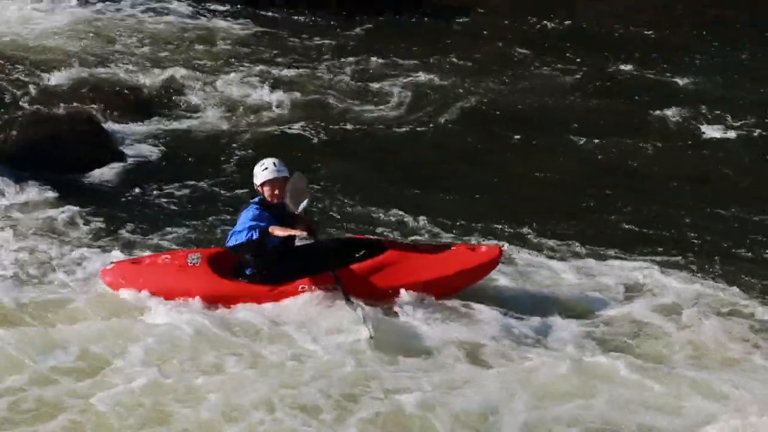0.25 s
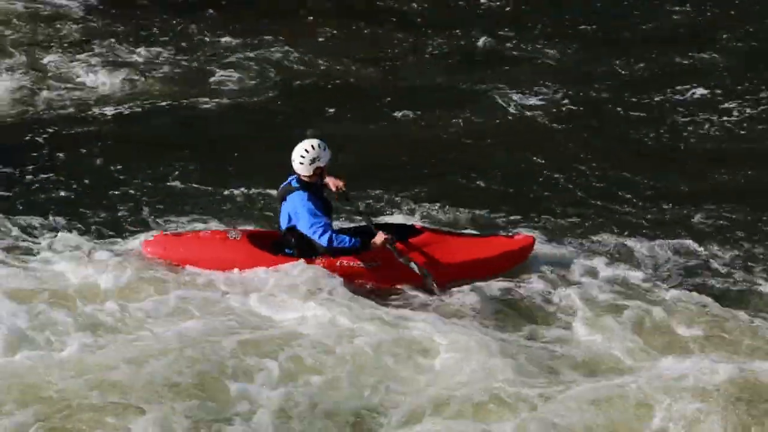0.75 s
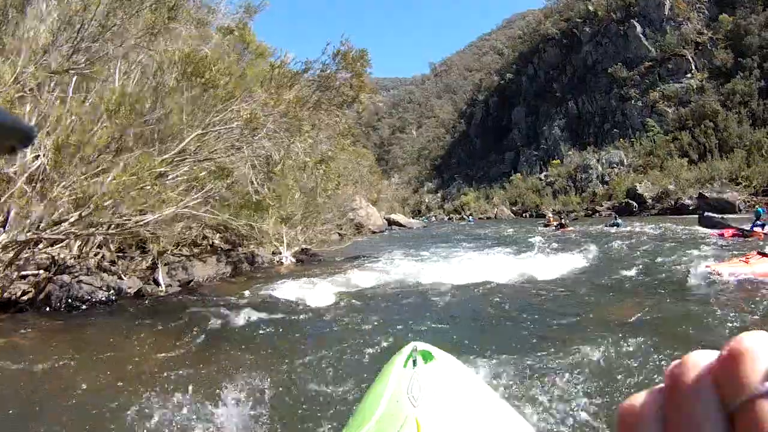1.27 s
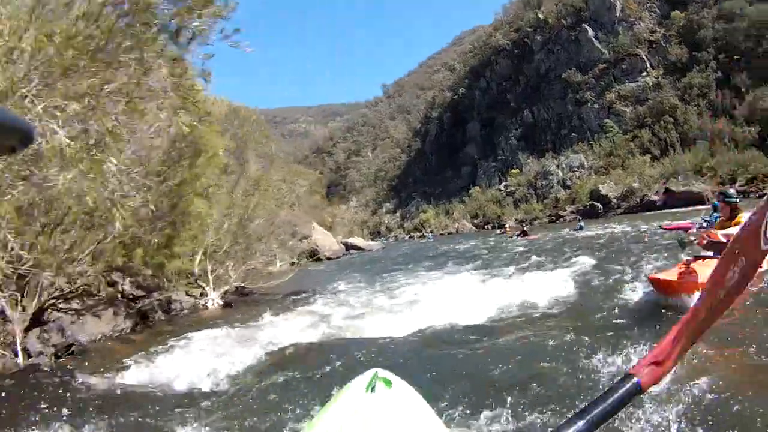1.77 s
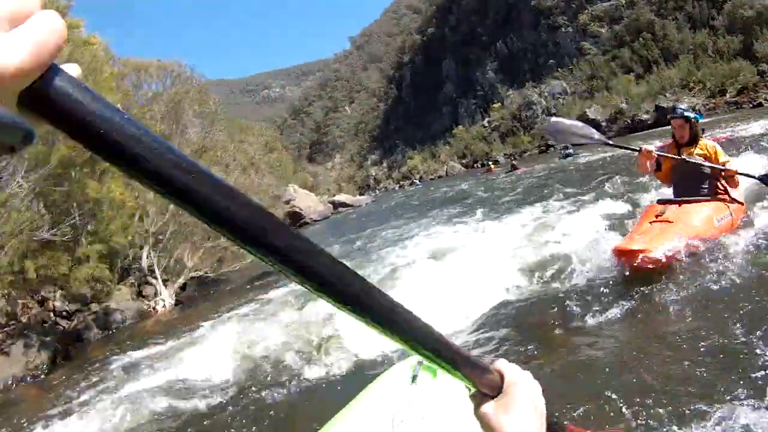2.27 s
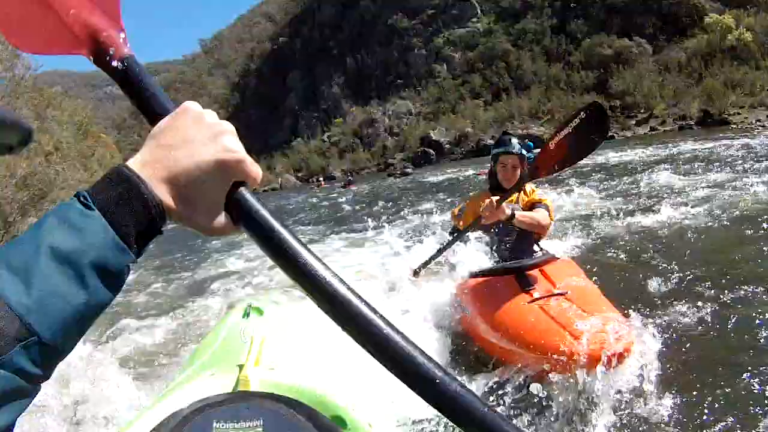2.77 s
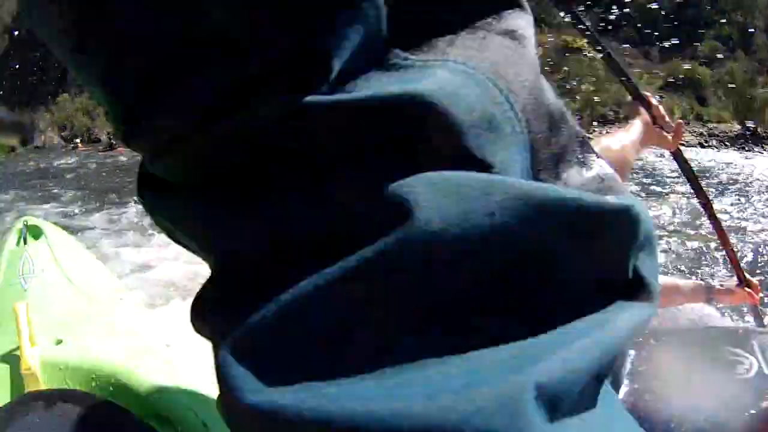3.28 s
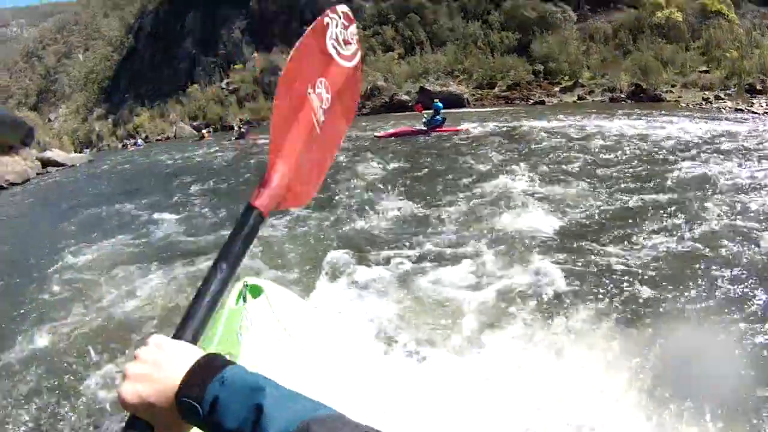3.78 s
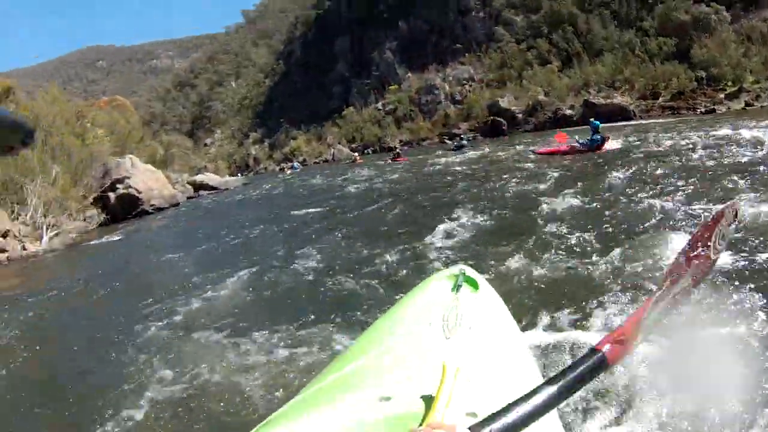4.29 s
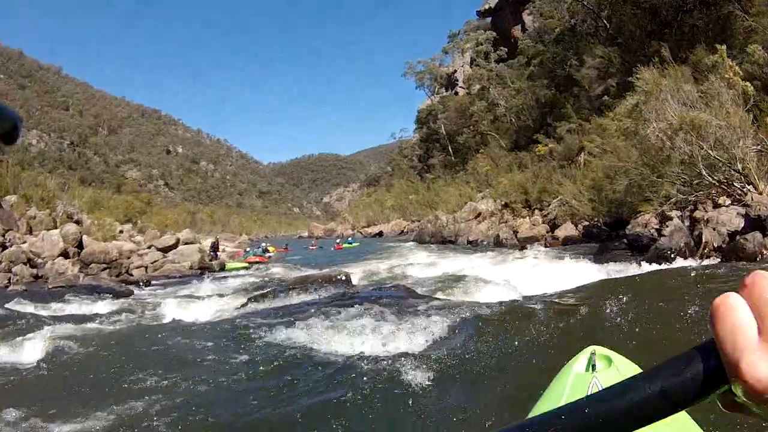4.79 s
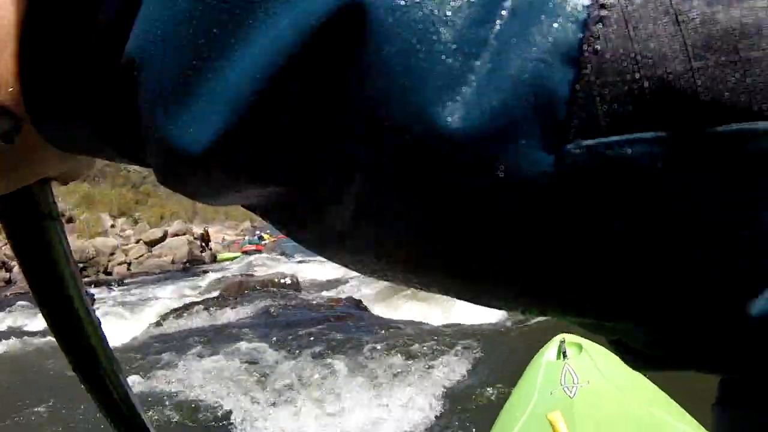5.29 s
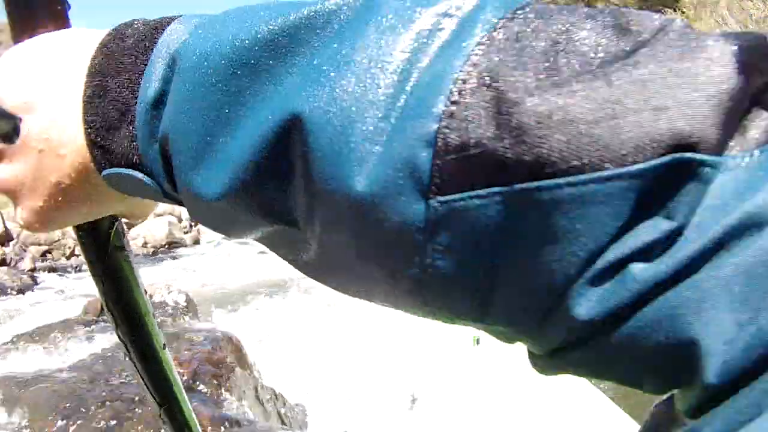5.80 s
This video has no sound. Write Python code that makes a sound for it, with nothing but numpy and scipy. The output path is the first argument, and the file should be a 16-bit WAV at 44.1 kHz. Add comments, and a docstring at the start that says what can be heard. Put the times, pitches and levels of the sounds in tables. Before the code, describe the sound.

Loud whitewater roars with wind buffeting the microphone, then cuts abruptly to faint water rushing and fizzing around a paddled kayak.

```python
"""Whitewater roars as countless bubbles ring in river rapids, heard from the bank while wind buffets
the two microphones. At 1.11 s the scene switches to a kayak, faint and in mono through a waterproof
camera case. Paddle strokes stir up foam and spray, water knocks on the hull, drops hit the case,
and the boat ploughs through a breaking wave that leaves fizzing froth.
At 4.48 s a calmer stretch begins, slowly growing louder as the next rapid draws near."""
import sys
import numpy as np
from scipy import signal
from scipy.fft import rfft, irfft
from scipy.io import wavfile
from scipy.ndimage import uniform_filter1d

SR = 44100
rng = np.random.default_rng(int(sys.argv[2]) if len(sys.argv) > 2 else 0)


def bounce(signal):
    """Save signal as a 16-bit WAV file at the path given by the first command-line argument."""
    frames = np.transpose(np.atleast_2d(signal))
    limited = np.clip(frames, -1, 1)
    pcm = np.round(limited * 32767).astype(np.int16)
    wavfile.write(sys.argv[1], SR, pcm)


N = 266805
TIME = np.arange(N) / SR
FREQS = np.maximum(np.arange(N // 2 + 1) * SR / N, 1)
ON_BOAT_S, CALMER_S = 1.1115, 4.483
CHURN_TOP_HZ, SPRAY_FROM_HZ, CUTOFF_HZ = 600, 4000, 14900


def from_db(db):
    """Turn decibels into a number to multiply by."""
    return 10 ** (np.asarray(db) / 20)


def rms_one(x):
    """Scale a signal so that its average strength (rms) is 1."""
    return x / np.sqrt(np.mean(x ** 2) + 1e-20)


def at_hz(points):
    """Join a table's points into a curve over all frequencies, spaced by octaves."""
    hz, value = np.transpose(points)
    return np.interp(np.log(FREQS), np.log(hz), value)


def below(hz, order=4):
    """A filter curve that keeps the lows; a higher order cuts more steeply."""
    return 1 / np.sqrt(1 + (FREQS / hz) ** (2 * order))


def above(hz, order=4):
    """A filter curve that keeps the highs."""
    return 1 / np.sqrt(1 + (hz / FREQS) ** (2 * order))


def colour(x, gain):
    """Turn each frequency of a sound up or down by a filter curve."""
    return irfft(rfft(x) * gain, N)


def around(s, reach_s):
    """The samples within reach of a moment."""
    return slice(max(int((s - reach_s) * SR), 0), int((s + reach_s) * SR))


def humps(rows):
    """Smooth bell-shaped rises and dips, in dB."""
    out = np.zeros(N)
    for s, db, half_s in rows:
        span = around(s, np.pi * half_s)
        out[span] += db * np.exp(-((TIME[span] - s) / half_s) ** 2)
    return out


def drift(rate_hz):
    """A smooth random wobble, typically about 1 in size."""
    step, warm_up = 40, 2000   # one random value every 40 samples
    decay = np.exp(-2 * np.pi * step * rate_hz / SR)
    noise = rng.standard_normal(N // step + warm_up + 2)
    slow = signal.lfilter([1], [1, -2 * decay, decay * decay], noise)[warm_up:]
    return np.interp(np.arange(N) / step, np.arange(len(slow)), rms_one(slow))


def bubbles(per_s, spread_db, cycles, low_hz, high_hz, pitches=20):
    """Bubbles of random size, each ringing for a few cycles at its own pitch."""
    starts = np.flatnonzero(rng.random(N) < per_s / SR)
    sizes = from_db(spread_db * np.minimum(rng.exponential(1, len(starts)), 4))
    sizes *= rng.choice([-1, 1], len(starts))
    pitch_of = rng.integers(0, pitches, len(starts))
    out = np.zeros(N)
    for k, hz in enumerate(np.geomspace(low_hz, min(high_hz, SR / 2.2), pitches)):
        clicks = np.full(N, 1e-18)
        clicks[starts[pitch_of == k]] = sizes[pitch_of == k]
        decay = np.exp(-np.log(1000) * hz / (cycles * SR))   # 60 dB down after that many cycles
        ringing = [1, -2 * decay * np.cos(2 * np.pi * hz / SR), decay * decay]
        out += signal.lfilter([1 - decay, 0, decay - 1], ringing, clicks)
    return rms_one(out)


def swell_ring(start, hz, swell_s):
    """A soft, wet hit: a tone swells briefly, then dies away."""
    out = np.zeros(N)
    span = slice(int(start * SR), int(start * SR) + SR // 2)
    age = np.maximum(TIME[span] - start, 0)
    out[span] = age / swell_s * np.exp(1 - age / swell_s) * np.sin(2 * np.pi * hz * age)
    return out


# The roar's tone, from low to high: f/Hz, level/dB
ROAR_TONE = [(40, -16), (100, -10.5), (220, -2.5), (340, -2.5), (550, -6.5), (850, -9.5), (1300, -12.5),
             (2300, -15), (4000, -20.5), (7000, -27), (10000, -32), (14500, -40)]
# Narrow bands that ring in the roar: f/Hz, width/Hz, boost/dB
ROAR_RINGS = [(755, 40, 0.5), (999, 66, 5.5)]
# Roughly how much louder the roar is on the left: f/Hz, left minus right/dB
ROAR_LEFT_LEAN = [(200, 1.6), (800, 2.3), (2000, 5.6), (5500, 6.7), (9000, 7.7), (15000, 11.3)]
# How alike the two sides sound: f/Hz, likeness (0 to 1)
SIDE_LIKENESS = [(200, 0.93), (850, 0.92), (1700, 0.83), (3400, 0.39), (6500, 0.45), (12000, .25)]
# Collapsing waves that make the roar swell: t/s, boost/dB, half length/s
COLLAPSING_WAVES = [(.33, 1.94, .13), (.83, 1.7, 0.15)]
def roar(level_db=-26.0, left_delay_s=0.00018, right_delay_s=0.000095):
    """Countless bubbles merge into a roar, louder on the left and a touch earlier on the right."""
    rings_db = sum(db / (1 + (2 * (FREQS - hz) / width) ** 2) for hz, width, db in ROAR_RINGS)
    tone = rms_one(from_db(at_hz(ROAR_TONE) + rings_db) * above(30))
    water = rfft(rms_one(rng.standard_normal(N) + 0.5 * bubbles(6000, 2.4, 12.0, 313, 11700)))
    alike, lean_db = np.clip(at_hz(SIDE_LIKENESS), 0, 1), at_hz(ROAR_LEFT_LEAN)
    mics = []
    for side, delay_s in ((0.98, left_delay_s), (-1.1, right_delay_s)):
        shared = np.sqrt(alike) * water * np.exp(-2j * np.pi * FREQS * delay_s)
        scattered = np.sqrt(1 - alike) * rfft(rng.standard_normal(N))
        mics.append(irfft((shared + scattered) * tone * from_db(side * lean_db / 2), N))
    return from_db(level_db + humps(COLLAPSING_WAVES)) * np.array(mics)


# The wind's tone at the left and the right microphone: f/Hz, level/dB
LEFT_WIND_TONE = [(15, -28), (40, -16), (80, -3.5), (140, -.5), (240, .5), (450, -8.5), (700, -17),
                  (1500, -35)]
RIGHT_WIND_TONE = [(15, -28), (40, -16), (80, 0.5), (125, -0.5), (200, -3), (350, -8), (800, -39)]
# Gusts and lulls on the left: t/s, level change/dB, half length/s
LEFT_GUSTS = [(.075, -6.5, 0.023), (.305, -3.5, 0.021), (.4, 0.5, .05), (.508, -9, 0.029), (.57, 4, 0.023),
              (.7, -2.5, 0.07), (.81, 2.5, 0.021), (.89, -11.5, .03), (1.04, -3.5, 0.044)]
# Single swirls of air that slap the left microphone: t/s, level/dB, f/Hz
AIR_SLAPS = [(.168, -8, 190), (.378, -5.5, 330), (.463, -7, 266), (.561, -13, 240), (.828, -6.5, 290),
             (.980, -6, 267), (1.058, -5, 260)]
def wind(left_db=-18.5, right_db=-27.5, flutter_db=1.98):
    """Swirling air rumbles at each microphone; the strongest swirls give one push and pull."""
    mics = []
    for gust_db, tone in ((left_db + humps(LEFT_GUSTS), LEFT_WIND_TONE), (right_db, RIGHT_WIND_TONE)):
        swirls = colour(rng.standard_normal(N), from_db(at_hz(tone)) * below(1500))
        swirls /= np.sqrt(uniform_filter1d(swirls ** 2, size=2600))   # even out the noise's own swells
        mics.append(swirls * from_db(gust_db + flutter_db * drift(43)))
    for s, db, hz in AIR_SLAPS:
        span = around(s, 1 / hz)
        phase = 2 * np.pi * hz * (TIME[span] - s)
        mics[0][span] -= from_db(db) * phase * np.exp((1 - phase ** 2) / 2)
    return np.array(mics)


# How lively the water is around the wave, given as its foam's loudness: t/s, level/dB
WAVE_LIVELINESS = [(1.15, -55), (1.61, -56), (2.86, -52), (3.01, -49.5), (3.16, -49), (3.85, -52),
                   (3.97, -53), (4.34, -56), (4.47, -56)]
# Tone of water and spray in the wave, inside a case that rings near 1.7 and 6.5 kHz: f/Hz, level/dB
WAVE_WATER_TONE = [(15, -54), (25, -20), (206, -7.5), (311, -5.5), (395, -3), (480, -3), (680, -3),
                   (1050, -4.5), (1620, 0), (1890, -2.5), (3470, -19.5), (4500, -15.5), (5850, -47),
                   (9900, -120)]
WAVE_SPRAY_TONE = [(2060, -45), (3500, -14), (4050, -14), (5300, -13.5), (6510, 1.5), (7720, -8),
                   (8890, -8), (10100, -12.5), (13600, -9.5), (14400, -18), (15000, -35)]
# The same on the calmer stretch: f/Hz, level/dB
CALM_WATER_TONE = [(15, -62), (25, -32), (64, -15.5), (220, -6.5), (354, -4.5), (547, -4), (774, -4.5),
                   (1000, -4.5), (1250, -5.5), (1390, -2.5), (1930, -3), (2790, -16.5), (4500, -24),
                   (5850, -55), (9900, -120)]
CALM_SPRAY_TONE = [(2060, -40), (3500, -7), (5590, -10.5), (6200, -0.5), (6590, 0), (8720, -5),
                   (11000, -9.5), (13600, -9), (14600, -19), (15000, -34)]
# Paddle strokes, about two a second, that stir up foam and spray: t/s, boost/dB
PADDLE_STROKES = [(1.95, 1.5), (2.38, 2), (2.9, 2.5), (3.34, 0.9), (3.86, 3.3), (4.26, 2.0), (4.75, 0.5),
                  (5.57, 0.8), (5.97, 2)]
def water_on_boat(lively_db, water_tone, spray_tone, churn_db, spray_db,
                  churn_follows, spray_follows, fizz_share, spurt_db):
    """Low churning, rushing foam and fizzing spray all grow as the water gets livelier."""
    quiet_db, stroke_half_s = -55, 0.077
    churn_lead_s, spray_lag_s = 0.058, 0.07   # the hull churns before the foam breaks; spray lands after
    stir_db = lively_db - quiet_db
    stroke_db = humps((s, db, stroke_half_s) for s, db in PADDLE_STROKES)
    churn_level = churn_db + churn_follows * np.interp(TIME + churn_lead_s, TIME, stir_db)
    foam_level = lively_db + stroke_db
    spray_level = spray_db + spray_follows * np.interp(TIME - spray_lag_s, TIME, stir_db) + stroke_db
    water_gain, spray_gain = from_db(at_hz(water_tone)), from_db(at_hz(spray_tone))
    gurgle = rng.standard_normal(N) + 0.16 * bubbles(400, 2.8, 12.4, 136, 680)
    rush = rng.standard_normal(N) + 0.25 * bubbles(2500, 2.8, 9.3, 532, 3600)
    fizz = rng.standard_normal(N) + fizz_share * bubbles(5000, 3.3, 3.1, 4300, 13700)
    churn = rms_one(colour(gurgle, water_gain * below(CHURN_TOP_HZ)))
    foam = rms_one(colour(rush, water_gain * above(CHURN_TOP_HZ) * below(SPRAY_FROM_HZ, order=10)))
    spray = rms_one(colour(fizz, spray_gain * above(SPRAY_FROM_HZ, order=10)))
    spurts = spurt_db * drift(23)
    return (churn * from_db(churn_level)
            + foam * from_db(foam_level + spurts / 2)
            + spray * from_db(spray_level + spurts))


# Water knocking on the hull: t/s, level/dB, f/Hz
HULL_KNOCKS = [(1.325, -58, 248), (1.887, -46, 1500), (1.978, -59, 58), (2.096, -48, 1300),
               (2.553, -49, 360), (2.922, -54, 150), (3.363, -42, 800), (3.601, -42.5, 520),
               (3.606, -49, 262), (3.617, -48.5, 159), (3.64, -61, 65), (4.269, -43, 1520),
               (4.486, -47.5, 368), (4.518, -53, 312), (4.551, -54, 342), (5.085, -53, 580)]
def hull_knocks(swell_at_400_hz_s=0.0025):
    """Water knocks and glugs against the boat; lower knocks swell more slowly."""
    return sum(from_db(db) * swell_ring(s, hz, swell_at_400_hz_s * (400 / hz) ** 0.6)
               for s, db, hz in HULL_KNOCKS)


# The tones the case's wall rings with: f/Hz, level relative to the big drop/dB, time to swell/s
CASE_TONES = [(1300, -19, 0.00092), (2020, -16, 0.001), (2740, -11, 0.00068), (3300, 2.5, 0.00051),
              (3680, -11, 0.001), (4200, -10, 0.00054), (6460, -11, 0.00063), (7400, -4.5, 0.00047),
              (8700, -15.5, 0.00046)]
# Small droplets landing on the case: t/s, level before the boost/dB
SMALL_DROPS = [(1.6442, -47), (1.957, -49), (2.0946, -49), (2.4389, -44), (2.5247, -44), (3.0744, -40),
               (3.8337, -39), (3.9888, -40), (4.2243, -45), (4.2892, -40)]
def drops(big_drop_s=2.7641, big_drop_db=-18, tick_boost_db=2.0, tick_hz=10500):
    """One big drop makes the camera case ring; small ones only tick."""
    out = sum(from_db(big_drop_db + db) * swell_ring(big_drop_s, hz, swell_s)
              for hz, db, swell_s in CASE_TONES)
    sizes = rng.uniform(0.86, 1.25, len(SMALL_DROPS))
    for (s, db), size in zip(SMALL_DROPS, sizes):
        out += from_db(db + tick_boost_db) * swell_ring(s, tick_hz / size, swell_s=0.00008)
    return out


# The tone of the rumble under the boat's nose: f/Hz, level/dB
PLOUGH_TONE = [(15, -28), (40, -13), (80, -7), (130, -0.5), (250, 1.5), (400, -7), (700, -26), (2000, -60)]
def plough(start_s=2.77, level_db=-61, rise_s=0.13, hold_s=0.32, fall_s=0.25):
    """Air and water tumble under the boat's nose as it cuts through the wave."""
    corners = start_s + np.cumsum([0, rise_s, hold_s, fall_s])
    push = np.interp(TIME, corners, [0, 1, 1, 0])
    rumble = rms_one(colour(rng.standard_normal(N), from_db(at_hz(PLOUGH_TONE))))
    return from_db(level_db) * push * rumble


def froth(start_s=3.07, level_db=-54.5, swell_s=0.43):
    """Tiny bubbles beaten in by the wave burst at the surface, and their fizz dies away."""
    age = np.maximum(TIME - start_s, 0) / swell_s
    tone = from_db(at_hz(WAVE_SPRAY_TONE)) * above(SPRAY_FROM_HZ, order=10)
    fizz = rms_one(colour(rng.standard_normal(N), tone))
    return from_db(level_db) * age * np.exp(1 - age) * fizz


# Nearby splashes raining on the case: t/s, level/dB, time to swell/s
NEAR_SPLASHES = [(3.07, -60, .09), (3.325, -53, 0.041), (3.53, -55, 0.047), (3.64, -61, .04),
                 (3.815, -55, .018), (3.89, -55, .014)]
def splashes(from_hz=10500):
    """Each splash is a short shower of very fine drops."""
    patter = rng.standard_normal(N) + bubbles(4000, 3.3, 3, 7000, 15000)
    shower = rms_one(colour(patter, above(from_hz, order=3) * below(CUTOFF_HZ, order=40)))
    strength = np.zeros(N)
    for s, db, swell_s in NEAR_SPLASHES:
        age = np.maximum(TIME - s, 0) / swell_s
        strength += from_db(db) * age * np.exp(1 - age)
    return shower * strength


def scene(calm_start_db=-56, approach_db_per_s=2):
    """The bank, the wave and the calmer stretch follow each other with sudden cuts."""
    wave_db = np.interp(TIME, *np.transpose(WAVE_LIVELINESS))
    calm_db = calm_start_db + approach_db_per_s * (TIME - CALMER_S)   # the next rapid draws nearer
    wave = water_on_boat(wave_db, WAVE_WATER_TONE, WAVE_SPRAY_TONE, churn_db=-64.5, spray_db=-59.5,
                         churn_follows=1.21, spray_follows=1.28, fizz_share=0.58, spurt_db=1.5)
    calm = water_on_boat(calm_db, CALM_WATER_TONE, CALM_SPRAY_TONE, churn_db=-61.5, spray_db=-61.0,
                         churn_follows=0.99, spray_follows=1.3, fizz_share=0.64, spurt_db=0.5)
    water = np.where(TIME < CALMER_S, wave + plough() + froth(), calm)
    boat = water + splashes() + drops() + hull_knocks()
    bank = roar() + wind()
    return np.where(TIME < ON_BOAT_S, bank, boat)


def record(dry):
    """Cut away the very highest treble."""
    return colour(dry, below(CUTOFF_HZ, order=80))


dry = scene()
out = record(dry)
bounce(out)
```